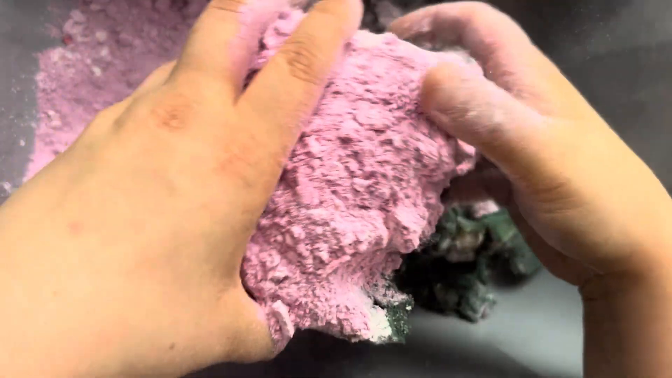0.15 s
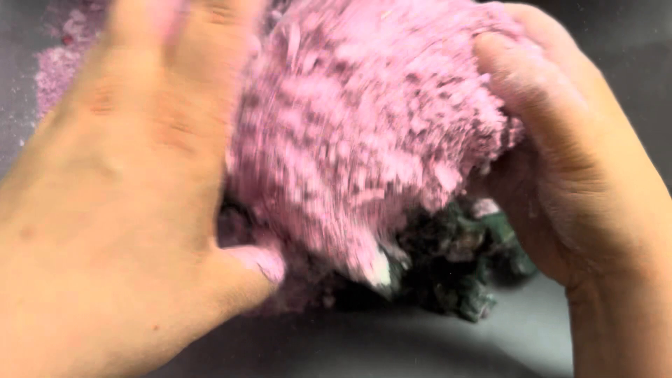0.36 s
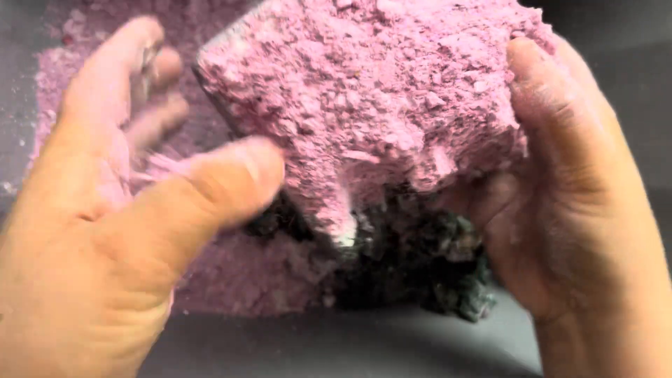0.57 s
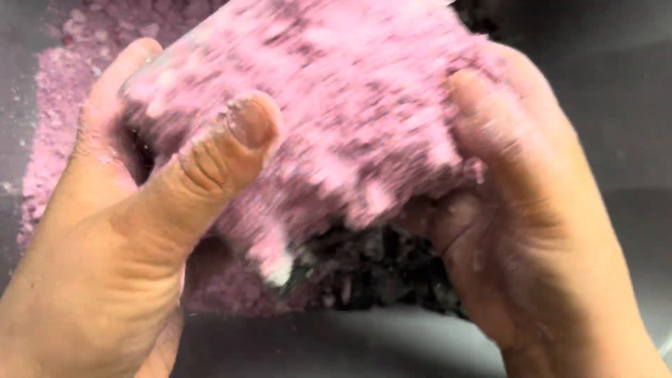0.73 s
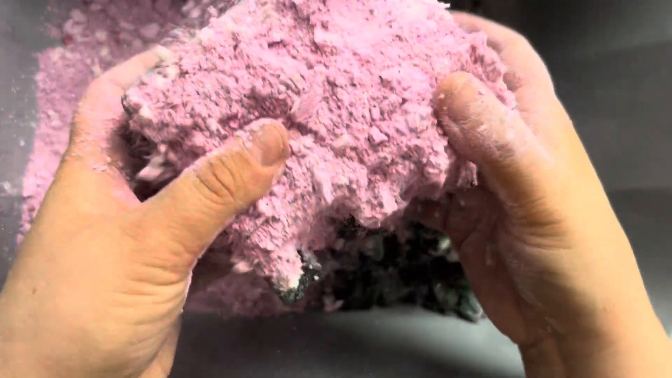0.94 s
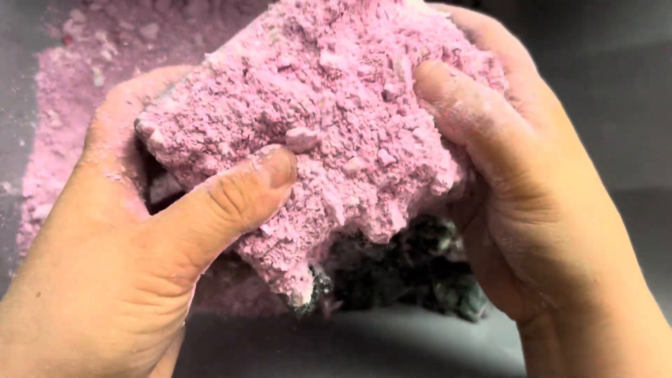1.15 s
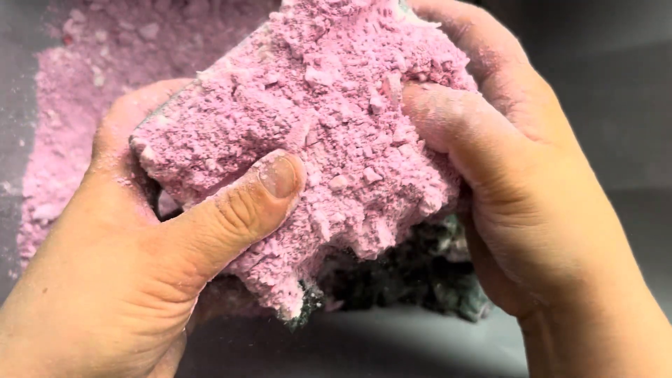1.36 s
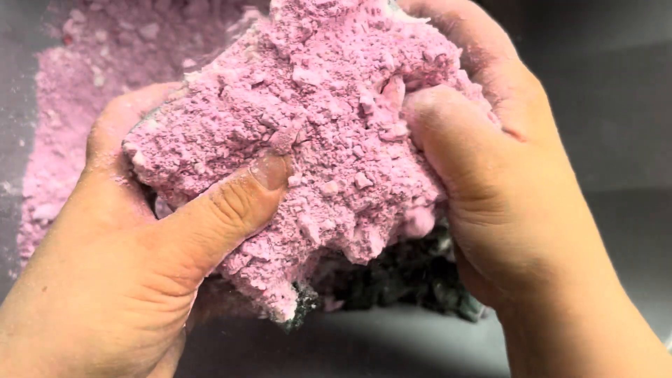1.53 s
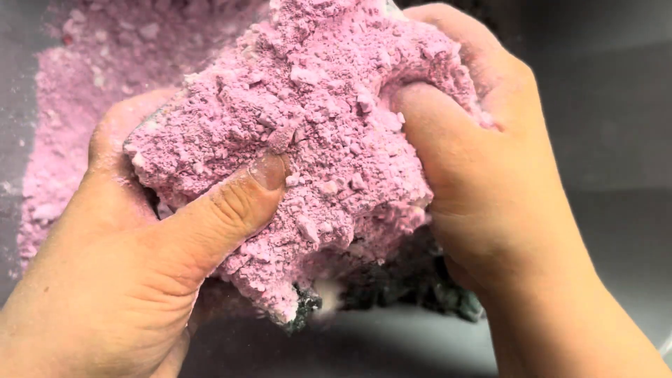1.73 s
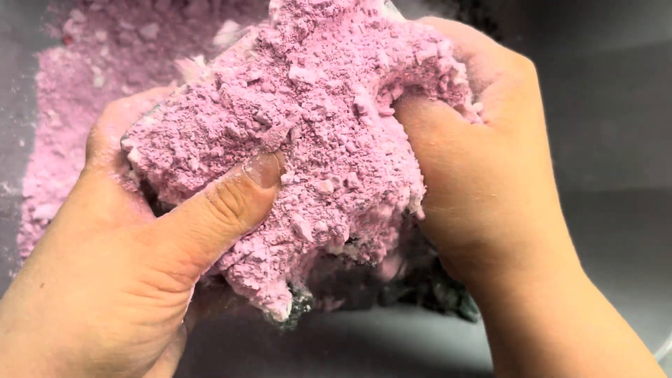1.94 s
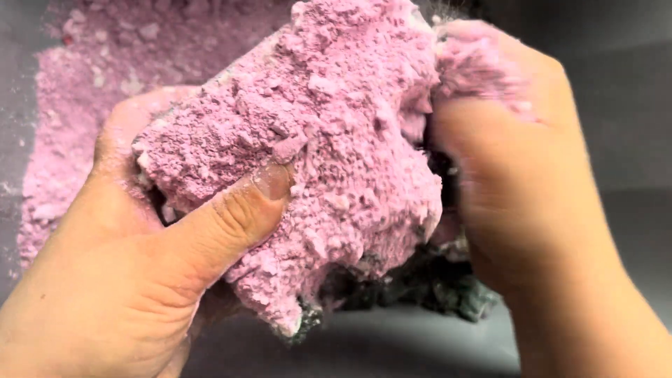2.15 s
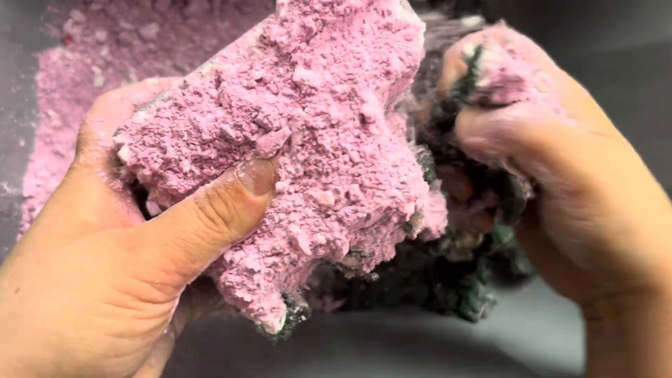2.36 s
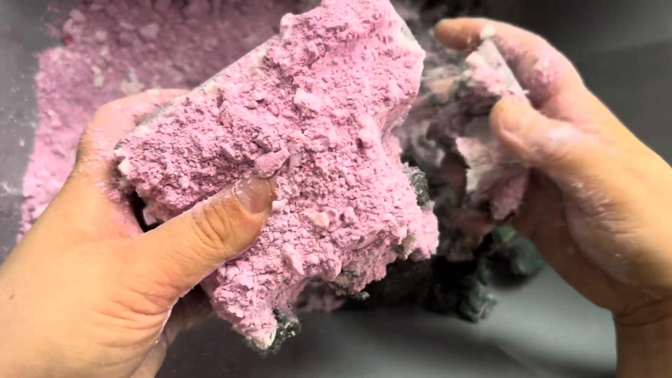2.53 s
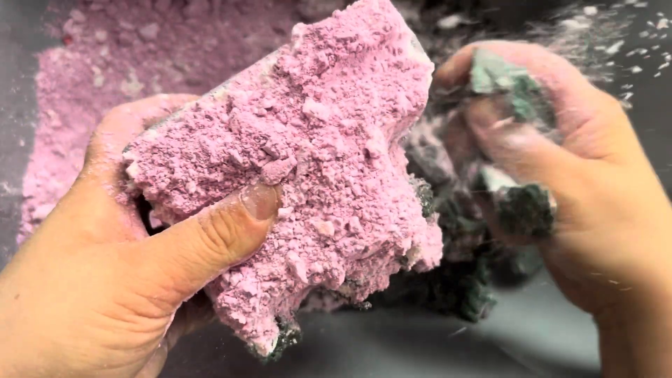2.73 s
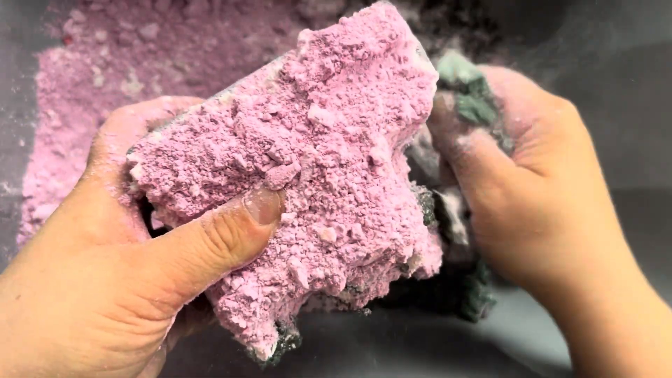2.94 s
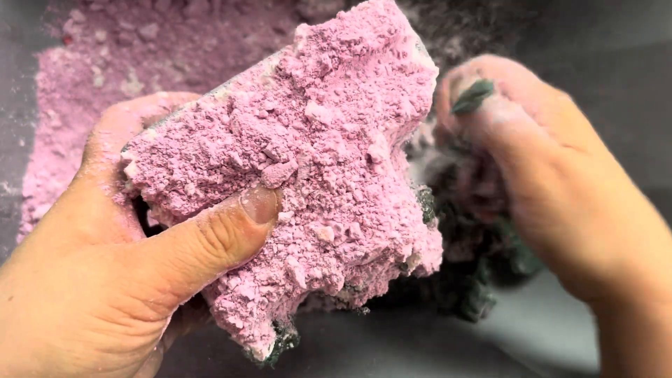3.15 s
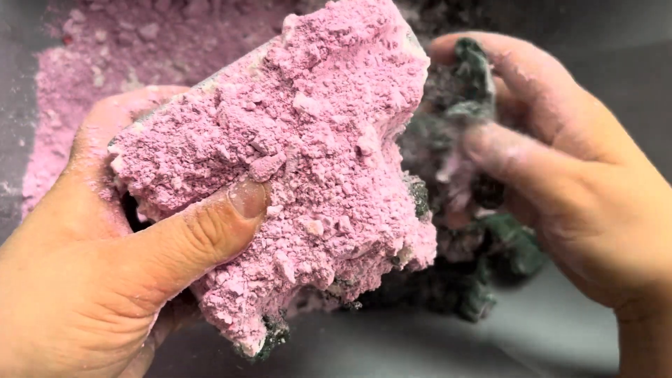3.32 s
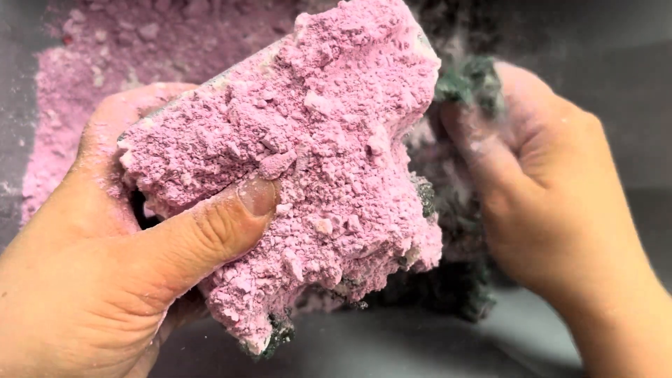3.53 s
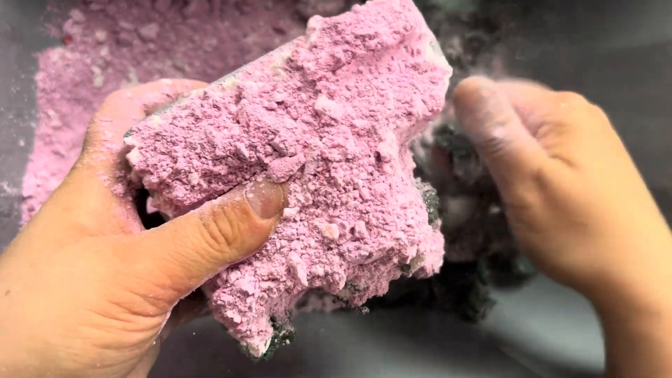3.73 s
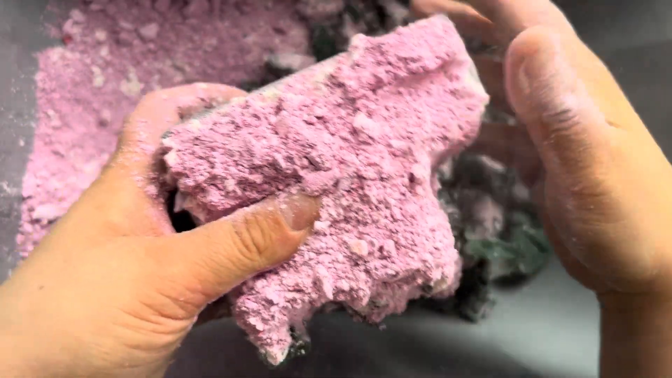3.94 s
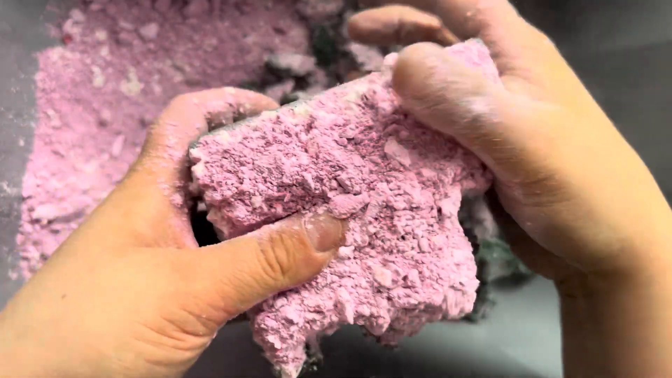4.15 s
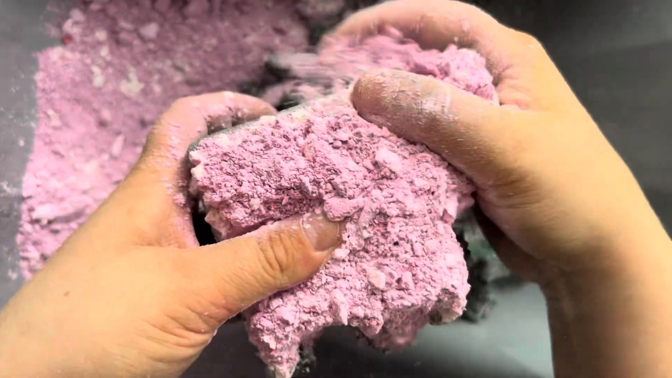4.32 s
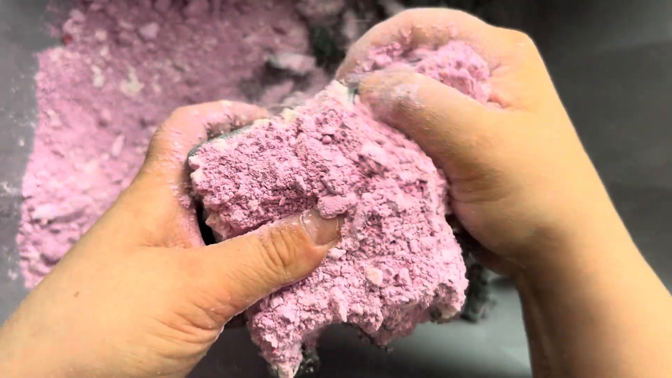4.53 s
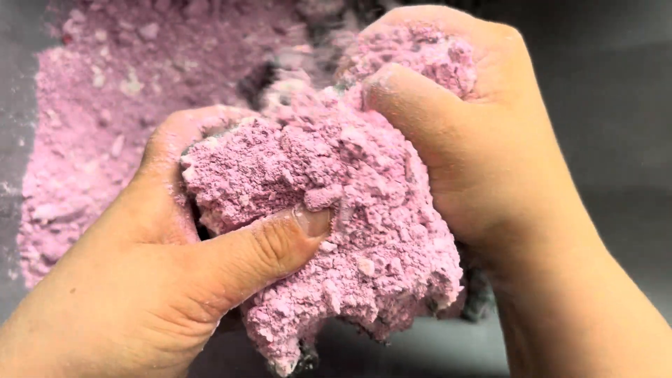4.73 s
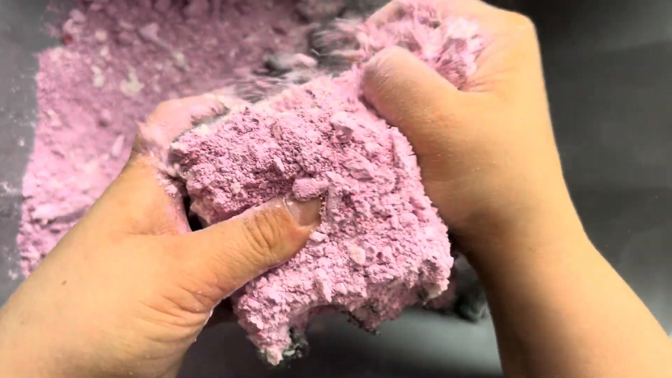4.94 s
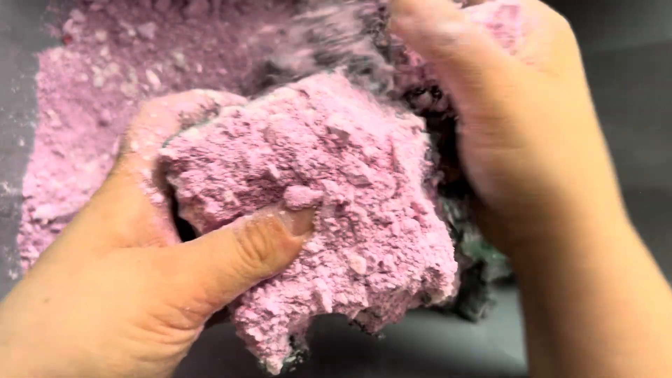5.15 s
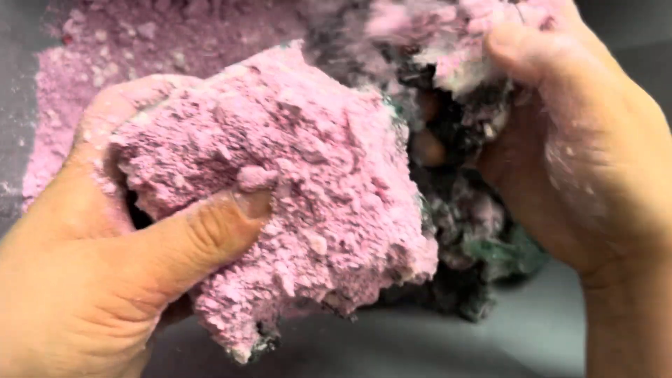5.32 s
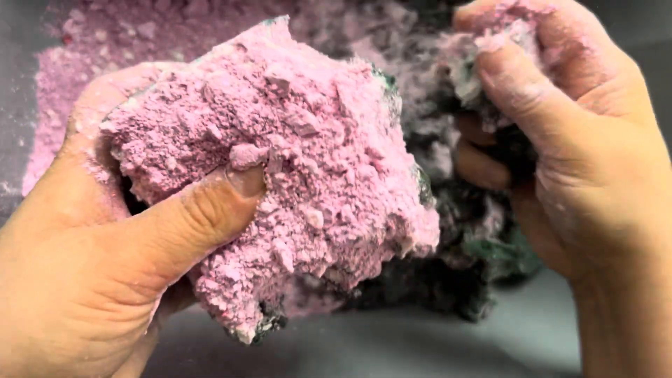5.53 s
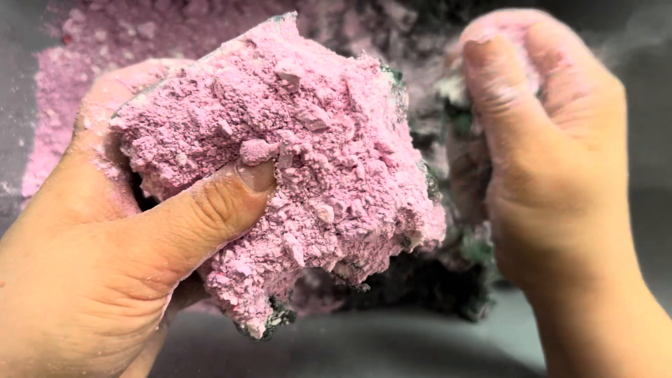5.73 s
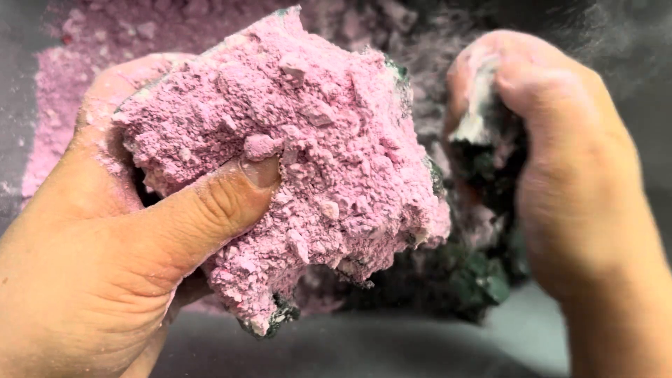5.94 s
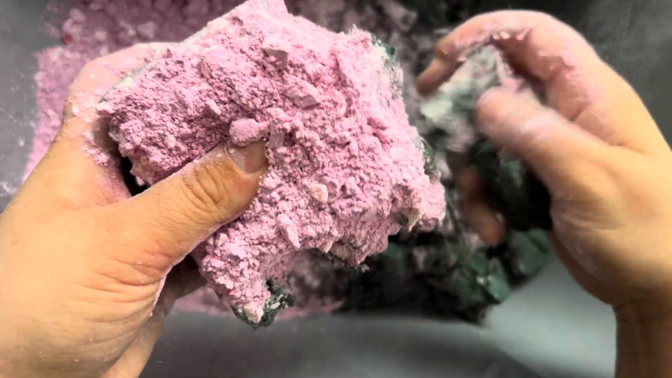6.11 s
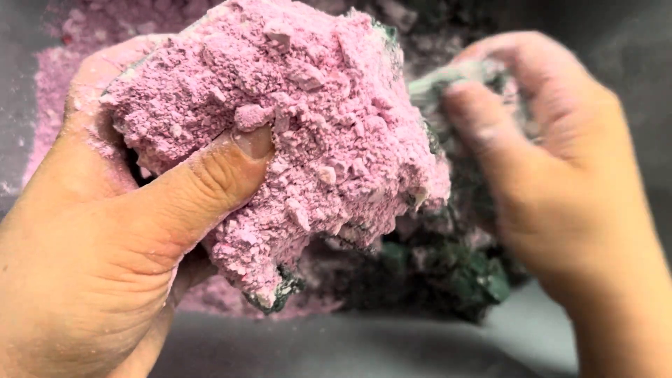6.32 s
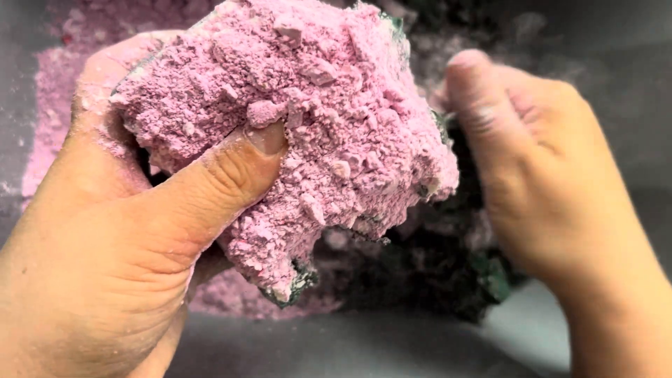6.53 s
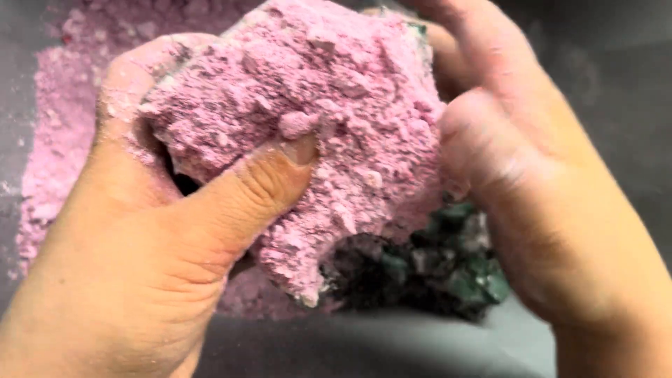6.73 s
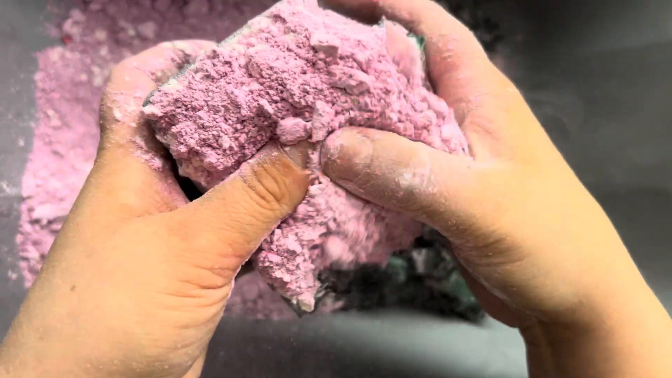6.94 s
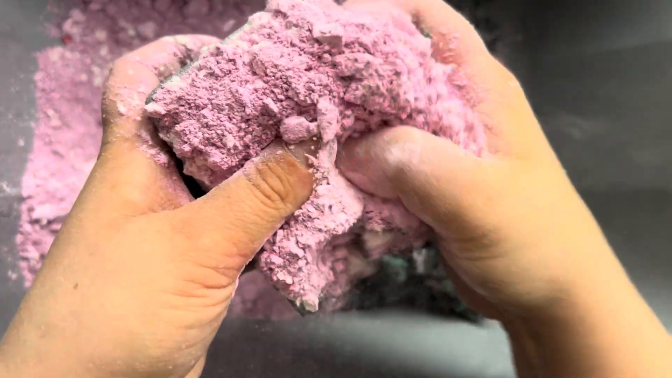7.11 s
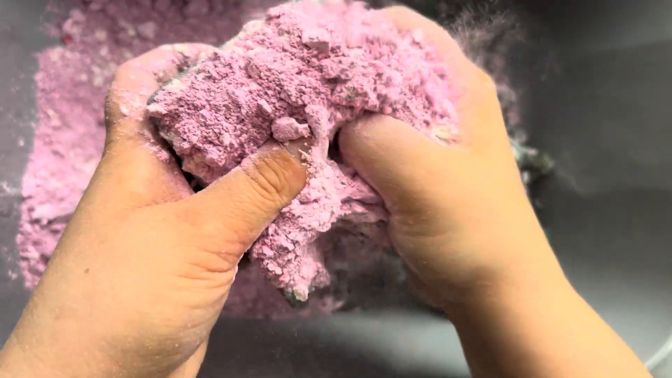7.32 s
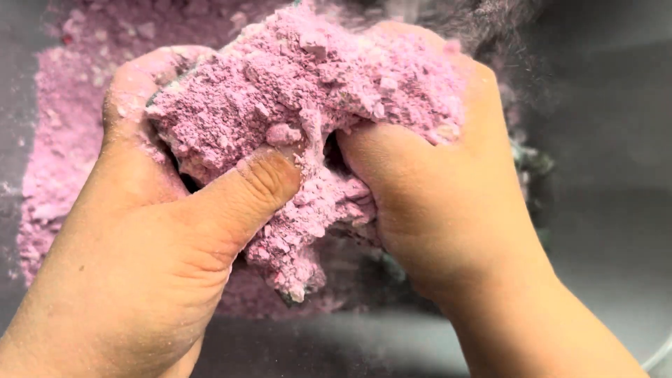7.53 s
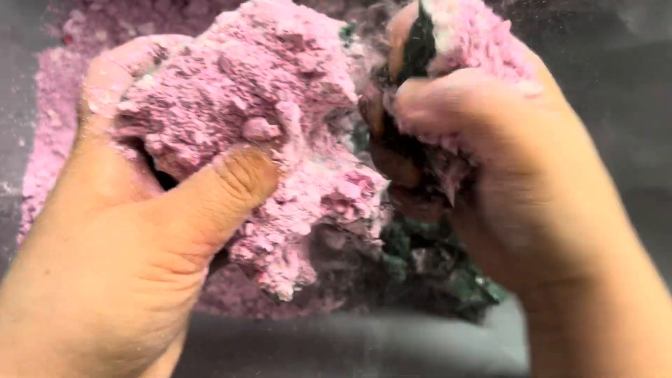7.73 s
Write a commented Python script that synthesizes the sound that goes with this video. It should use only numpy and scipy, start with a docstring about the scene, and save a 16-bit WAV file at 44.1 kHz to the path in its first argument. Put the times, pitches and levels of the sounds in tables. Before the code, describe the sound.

Close, dry crunching of brittle foam squeezed by hand: three bursts of crackle and loud snaps, separated by faint crumbs and sifting powder.

```python
"""Dry foam block, squeezed by hand

Close, in front of a small microphone: hands crush a powder-coated foam block in three hard squeezes and
light crumbles. Noise cracks in clumps pass filters for cells, body and powder; the crust snaps in
ringing noise bursts, and two loud snaps thump the overdriven microphone input with a low pulse.
A finger squeaks once, an unsteady sine. Behind lies quiet room air, coloured noise; the loudest snaps clip softly.
"""
import sys
import numpy as np
from scipy import signal
from scipy.fft import rfft, irfft, next_fast_len
from scipy.io import wavfile
from scipy.ndimage import uniform_filter1d, map_coordinates

SR = 44100
rng = np.random.default_rng(int(sys.argv[2]) if len(sys.argv) > 2 else 0)


def rack_gain(trim_db):
    """Turn a fader trim in dB into the linear factor to multiply a signal by."""
    fader = np.asarray(trim_db, float)
    return 10 ** (fader / 20)


def transcribe(u):
    """Save the signal u as a 16-bit wav file named by the first command-line argument.

    u: samples, shape (n,) or (channels, n), limited to [-1, 1]; the rate is SR.
    q: integer samples, one column per channel.
    """
    v = np.clip(np.atleast_2d(u).T, -1, 1)
    q = np.round(v * 32767).astype(np.int16)
    wavfile.write(sys.argv[1], SR, q)


N = 347066

# Three hard squeezes, pressure heard as crunch: one list each of [t/s, level/dB]
SQUEEZE_PRESSURE = [
    [(1.187, -52), (1.277, -51), (1.313, -46), (1.365, -26), (1.453, -35), (1.55, -26), (1.742, -36.5),
     (1.786, -26.5), (1.812, -31.5), (1.88, -55.5)],
    [(4.123, -69), (4.179, -54.5), (4.262, -50), (4.298, -39.5), (4.416, -33), (4.56, -37.5), (4.602, -30),
     (4.655, -41.5), (4.691, -26.5), (4.737, -34.5), (4.763, -29), (4.833, -43), (4.901, -37), (4.949, -48),
     (5.001, -44), (5.064, -71)],
    [(6.745, -60.5), (6.896, -48.5), (6.988, -32.5), (7.072, -22.5), (7.142, -28.5), (7.319, -26),
     (7.371, -39.5), (7.409, -39), (7.511, -62)],
]
# Each squeeze over its crunch: [body at start/dB, body at end/dB, powder at start/dB, powder at end/dB]
SQUEEZE_BALANCE = [(-11, -10, -9.5, -6), (-8.5, -15, -8, -4), (-15.5, -14, -11, -6.5)]
# Light crumbles: [start t/s, length/s, peak level/dB, place of the peak/0-1,
#                  body over crunch/dB, powder over crunch/dB]
LIGHT_CRUMBLES = [(0.033, 0.072, -48, 0.27, -14, -11), (0.088, .1, -47.5, 1, -16, -1),
                  (0.401, .03, -63, .4, -12, -8.5), (.54, .11, -50.5, 0.35, -14, -4),
                  (0.686, 0.032, -49, .5, -12, -6), (0.665, 0.166, -49.5, 0.95, -10.5, -10.5),
                  (0.875, 0.32, -45.5, .74, -14, -8), (1.88, 0.16, -45.5, .32, -13.5, -6),
                  (2.039, 0.043, -37.5, 0.56, -12, -4), (2.071, 0.06, -42.5, 0.4, -17, -9),
                  (2.106, 0.054, -43, 0.84, -20, -11.5), (2.2, 0.14, -60, 0.6, -6, -4.5),
                  (2.486, 0.11, -47.5, .5, -13, -0.5), (2.618, 0.15, -50.5, 0.36, -17, 0),
                  (2.716, .23, -46, .7, -10, 0.5), (3.086, 0.067, -58.5, .65, -11.5, -1),
                  (3.168, 0.106, -59.5, .45, -19, -1.5), (3.309, 0.22, -51.5, 0.1, -13, -0.5),
                  (3.53, 0.13, -60.5, 0.75, -13, 4), (3.949, 0.065, -45, 0, -14, -7),
                  (3.999, 0.08, -41, .65, -13.5, -7.5), (5.296, 0.091, -54, 0.3, -6, -2.5),
                  (5.381, 0.16, -44.5, .47, -22, -2.5), (5.52, 0.368, -50, .16, -20, -2.5),
                  (6.03, .06, -51, .33, -12, -5), (6.097, 0.36, -50.5, 0.3, -19, -3.5),
                  (6.323, 0.09, -57, .3, -1.5, -7), (6.705, 0.019, -42, 0.5, -14, -10),
                  (7.523, 0.05, -47.5, 0.43, -7, -7), (7.8, 0.086, -54, .9, -9, -5)]
# Loose crumbs that keep trickling and stop when the hand lets go: [t/s, level/dB]
CRUMB_TRICKLE = [(0, -67), (.85, -69), (2.2, -62), (3.64, -65), (3.7, -73), (3.93, -80), (4.12, -70),
                 (5.06, -56), (5.28, -66), (5.95, -63), (6.44, -65), (6.49, -74), (6.69, -86),
                 (6.75, -57.5), (7.6, -60), (7.87, -62.5)]
# Centre of the band lifted by the hollow of the hands: [t/s, f/Hz]
HAND_HOLLOW = [(0, 2180), (.42, 1750), (.65, 2670), (.83, 1880), (1.1, 2450), (1.3, 1930), (1.9, 2250),
               (2.4, 2260), (2.83, 3060), (2.95, 1930), (3.3, 2835), (3.8, 1923), (4.0, 2630), (4.32, 1930),
               (4.8, 2480), (4.93, 1850), (5.28, 1940), (5.6, 3000), (5.93, 2050), (6.2, 2820), (6.4, 1900),
               (6.72, 2460), (7.0, 2260), (7.87, 2120)]
# Colour of collapsing cells: [f/Hz, relative level/dB per Hz]
CELL_SPECTRUM = [(600, -48), (950, -11), (1200, 2.5), (2000, -4), (3300, 0.5), (5000, 1), (7000, -18.5),
                 (10000, -51.5)]
# Colour of the thumping block: [f/Hz, relative level/dB per Hz]
BODY_SPECTRUM = [(120, -56.5), (220, -14), (400, -6), (650, 2.5), (850, -5), (1100, -1), (1500, -41.5)]
# Colour of falling powder: [f/Hz, relative level/dB per Hz]
POWDER_SPECTRUM = [(3000, -36.5), (5000, -5), (6500, -2), (9000, -6.5), (12000, -10.5), (15500, -15),
                   (16500, -65)]
# Dips in the colour of crumbs that fall low over the tray: [f/Hz, relative level/dB]
TRAY_SPECTRUM = [(1200, 0.5), (1450, -2), (1750, 2), (2150, 0), (2450, -6.5), (2800, 0), (4900, 0.5),
                 (5450, -2), (6100, 1), (7000, -1)]
# Crust snaps: [t/s, peak level of the ringing piece/dB, centre f/Hz, main 60 dB decay/ms, body over peak/dB]
CRUST_SNAPS = [(0.383, -38, 2210, 8, -34), (0.485, -44, 5000, 6, -40), (0.515, -39, 3500, 8, -35),
               (0.981, -34.5, 4200, 6.5, -43), (1.033, -32.5, 4230, 8, -14), (1.045, -31.5, 1700, 11, -11),
               (1.198, -25.5, 1500, 8, -34), (1.23, -32, 1470, 7.2, -32), (1.273, -24.5, 1280, 10, -29),
               (1.309, -33.5, 1380, 10, -5.5), (1.326, -27, 1860, 8.4, -6), (1.44, -24.5, 1590, 10, -8.5),
               (1.526, -6, 2030, 19, -16.5), (1.562, -2.5, 2100, 6, -13.5), (1.594, -17, 2670, 8, -5.5),
               (1.657, -14.5, 3490, 6, -32), (1.692, -15.5, 2130, 18, -16), (1.762, 2.5, 1310, 18, -12),
               (1.804, -14.5, 3150, 6, -31.5), (2.029, -32, 3630, 9, -32), (2.045, -22.5, 5000, 10, -24),
               (2.06, -20.5, 1800, 32, -19), (2.522, -36.5, 3160, 9, -18), (2.541, -25.5, 2000, 28, -12.5),
               (2.692, -22.5, 3330, 11, -29), (2.854, -30, 3720, 9.1, -18), (4.172, -35.5, 2520, 10, -17),
               (4.213, -28, 1660, 8, -12), (4.243, -29.5, 1760, 11, -9), (4.266, -23, 1130, 8.9, -9),
               (4.277, -27.5, 1860, 7, -5), (4.286, -29.5, 1162, 10, -8), (4.578, -9.5, 1580, 6.8, -11),
               (4.622, -11.5, 1910, 6.6, -48), (4.674, -17, 3520, 8, -37), (4.681, -16, 1800, 6.8, -14),
               (4.69, -19.5, 1800, 11, -11), (4.694, -21, 1500, 16, -15), (4.704, -9, 2200, 29, -24),
               (4.734, -12, 3460, 16, -33.5), (4.75, 0, 2560, 13.4, -18.5), (4.859, -33.5, 800, 22, 1),
               (4.98, -21, 5500, 6, -25), (5.4, -34, 6000, 6, -35), (5.433, -29.5, 3040, 9.2, -39),
               (5.454, -32, 2060, 11, -35), (5.58, -24, 4050, 10, -34), (6.998, -15, 2380, 7, -21),
               (7.035, -7.5, 2570, 3.4, -28), (7.042, -8.5, 3160, 5.1, -20), (7.058, -7.5, 2420, 21, -30),
               (7.165, -10.5, 2580, 3.4, -18.5), (7.221, -14.5, 2200, 5.6, -27),
               (7.285, -12.5, 950, 13, -40), (7.296, -2.5, 1940, 7, -24.5), (7.312, 0, 3000, 10.8, -18),
               (7.339, -15, 2000, 10.6, -17.5), (7.413, -25.5, 2180, 8.7, -15)]
# Low thumps of the overdriven microphone input at two loud snaps: [t/s, peak level/dB]
MICROPHONE_THUMPS = [(4.749, -42), (7.311, -29)]
# Finger squeak, before its random wobble: [t/s, f/Hz, level/dB]
FINGER_SQUEAK = [(.038, 1650, -81), (.040, 1663, -45.5), (.052, 1585, -50.5), (.062, 1642, -39),
                 (.072, 1890, -51), (.082, 2050, -65)]
# Colour of the room air: [f/Hz, relative level/dB per Hz]
AIR_SPECTRUM = [(15, -28.5), (30, 0.5), (120, -1), (400, -3), (1000, -3), (3000, -10.5), (8000, -19.5),
                (16000, -26)]

SWELL_DB, SAG_DB = 13, 9.5  # a crumble grows by this up to its peak, then sinks by that
ATTACK_DB_PER_S, RELEASE_DB_PER_S = 1200, 450  # edges of every squeeze and crumble
TRICKLE_POWDER_DB = -4  # powder over the trickle's crunch
HELD_BODY_DB = -76  # steady rustle of the held block
AIR_DB = -63.5  # room air, around which it wavers
TOP_HZ = 15800  # band limit of the microphone input


def crushing():
    """Cells fail in clumps; the same cracks ring the cells, thump the block and shake off powder."""
    crunch_gain, body_gain, powder_gain, squeezed = handling()
    hollow_hz, = curves(HAND_HOLLOW)
    clumps = rack_gain(2.0 * wobble(100) + 0.96 * wobble(300))
    # larger cell walls give way, and their neighbours follow in a rush that dies by 60 dB in 27 ms
    ticks = grains(150, spread_db=3.0)
    rush = signal.lfilter([1], [1, -rack_gain(-60 / (0.027 * SR))], np.abs(ticks))
    small_cracks = unit(clumps * (1 + 0.03 * rush) * grains(9000, spread_db=3))
    cracks = unit(small_cracks + 0.2 * ticks)
    # loose powder runs more smoothly than the cracks
    sift = unit(rack_gain(1.95 * wobble(60)) * rng.standard_normal(N))

    cells = coloured(crunch_gain * unit(cracks + 0.82 * sift), CELL_SPECTRUM)
    body = coloured(body_gain * cracks, BODY_SPECTRUM)
    powder = coloured(powder_gain * unit(cracks + 2.0 * sift), POWDER_SPECTRUM)
    grit = cupped(cells, hollow_hz, lift_db=10, octaves=0.5, patchy_db=1.6) + powder
    over_tray = coloured((1 - squeezed) * grit, TRAY_SPECTRUM)
    return squeezed * grit + over_tray + body


def handling():
    """Gains of crunch, body and powder (powers of all contacts add up), and the squeezes' crunch share."""
    t = np.arange(N) / SR
    trickle_db, = curves(CRUMB_TRICKLE)
    held_db = np.full(N, HELD_BODY_DB)
    light = rack_gain([trickle_db, held_db, trickle_db + TRICKLE_POWDER_DB]) ** 2
    for start_s, length_s, peak_db, place, body_db, powder_db in LIGHT_CRUMBLES:
        stop_s = start_s + length_s
        peak_s = start_s + np.clip(place, 0.02, 0.98) * length_s
        # the crumble with room for its edges
        near = slice(max(round((start_s - 0.1) * SR), 0), round((stop_s + 0.2) * SR))
        db = np.interp(t[near], [start_s, peak_s, stop_s], [-SWELL_DB, 0, -SAG_DB])
        db = db + peak_db + contact(start_s, stop_s)[near]
        light[:, near] += rack_gain([db, db + body_db, db + powder_db]) ** 2

    hard = np.zeros((3, N))
    for rows, balance in zip(SQUEEZE_PRESSURE, SQUEEZE_BALANCE):
        ends = [rows[0][0], rows[-1][0]]
        db = curves(rows)[0] + contact(*ends)
        body_db = db + np.interp(t, ends, balance[:2])
        powder_db = db + np.interp(t, ends, balance[2:])
        hard += rack_gain([db, body_db, powder_db]) ** 2
    squeezed = hard[0] / (light[0] + hard[0])
    return *np.sqrt(light + hard), squeezed


def contact(start_s, stop_s):
    """0 dB while hand and block touch, falling in straight dB slopes before and after."""
    t = np.arange(N) / SR
    early_s = np.clip(start_s - t, 0, None)
    late_s = np.clip(t - stop_s, 0, None)
    return -ATTACK_DB_PER_S * early_s - RELEASE_DB_PER_S * late_s


def cupped(x, hz, lift_db, octaves, patchy_db):
    """The hollow between hands and block lifts a moving band; crumbs add random patches of colour."""
    f, t, z = signal.stft(x, SR, nperseg=256)
    centre_hz = np.interp(t * SR, np.arange(N), hz)
    distance = np.log2((f[:, None] + 1) / centre_hz) / octaves
    lift = lift_db * np.exp(-0.5 * distance ** 2)
    patches = uniform_filter1d(rng.standard_normal(z.shape), size=3, axis=0)
    patches = uniform_filter1d(patches, size=24, axis=1)
    gain = rack_gain(lift + patchy_db * unit(patches))
    # hold each moment's gain, weighted by the average spectrum, at a power of 1
    power = np.mean(np.abs(z) ** 2, 1, keepdims=True)
    gain /= np.sqrt((gain ** 2 * power).sum(0) / power.sum())
    return signal.istft(z * gain, SR, nperseg=256)[1][:N]


def grains(rate, spread_db):
    """Single-sample cracks, on average rate a second, a few much larger than the rest; rms 1."""
    chance, size, sign = rng.random((3, N))
    happens = chance < rate / SR
    return unit(happens * rack_gain(-spread_db * np.log(size)) * np.sign(sign - 0.5))


def snaps():
    """A crack runs through the crust in a few ms: a sharp click, then a ragged burst round its own centre."""
    t = np.arange(2048) / SR
    s, db, hz, t60_ms, body_db = np.transpose(CRUST_SNAPS)[:, :, None]
    noise = rng.standard_normal((len(CRUST_SNAPS), len(t)))
    decay = rack_gain(-60 * (t * 1000 / t60_ms) ** 1.1)
    tail = 0.1 * rack_gain(-60 * t / 0.029)
    tearing = noise * (decay + tail) * (1 - np.exp(-t / 0.00011))
    first_break = 1.8 * np.sign(noise) * (t == 0)
    burst = tearing + first_break

    f = np.fft.rfftfreq(2 * len(t), 1 / SR)
    width_hz = hz + 300 + 1500 * rack_gain(db)  # big cracks spread wide
    ring = 1j * f * width_hz / (hz * hz - f * f + 1j * f * width_hz)
    # small pieces radiate little bass; soft foam damps the top
    lean = 1j * f / (600 + 1j * f) / (1 + 1j * f / 9000)
    # squared for steep skirts: a lean, dry crack
    piece = irfft(rfft(burst, 2 * len(t)) * (ring * lean) ** 2)[:, :len(t)]

    spit_db = -33 + 19 * np.log2(hz / 2500)  # thin pieces spit more treble
    shots = topped(piece)
    shots += rack_gain(body_db) * topped(coloured(burst, BODY_SPECTRUM))
    shots += rack_gain(spit_db) * topped(coloured(tearing, POWDER_SPECTRUM))
    at = np.round(s * SR).astype(int) + np.arange(len(t))
    return np.bincount(at.ravel(), (rack_gain(db) * shots).ravel(), N + len(t))[:N]


def microphone_thumps():
    """The overdriven microphone input thumps at two loud snaps: a quick low pulse without ring."""
    t = np.arange(N) / SR
    total = np.zeros(N)
    for s, db in MICROPHONE_THUMPS:
        age = np.clip(t - s, 0, None) / 0.00073  # peaks 0.73 ms after the start
        total += rack_gain(db) * np.e * age * np.exp(-age)
    return total


def squeak():
    """Skin slips on the dry surface: a short sine, unsteady in pitch and level."""
    hz, db = curves(FINGER_SQUEAK)
    db[round(FINGER_SQUEAK[-1][0] * SR):] = -120  # the slip is over
    level = rack_gain(db + 5.5 * wobble(254))
    unsteady_hz = hz * (1 + 0.034 * wobble(300))
    return level * np.sin(2 * np.pi * np.cumsum(unsteady_hz) / SR)


def room_air():
    """Steady room air: coloured noise, slightly wavering in level."""
    return rack_gain(AIR_DB + 0.99 * wobble(5.0)) * coloured(rng.standard_normal(N), AIR_SPECTRUM)


def coloured(x, spectrum):
    """x through the causal minimum-phase filter of this (f/Hz, level/dB) shape, mean power gain 1."""
    m = 2 * next_fast_len(x.shape[-1] // 2 + 2048)
    hz, db = np.transpose(spectrum)
    log_f = np.log(np.fft.rfftfreq(m, 1 / SR) + 1)
    gain = unit(rack_gain(np.interp(log_f, np.log(hz), db)))
    # folding the cepstrum forward in time makes the filter causal
    cepstrum = irfft(np.log(gain + 1e-6), m)
    cepstrum[1:m // 2] *= 2
    cepstrum[m // 2 + 1:] = 0
    return irfft(rfft(x, m) * np.exp(rfft(cepstrum)), m)[..., :x.shape[-1]]


def wobble(rate):
    """A smooth random curve, rate knots a second."""
    knots = rng.standard_normal(int(N * rate / SR) + 4)
    return map_coordinates(knots, [np.arange(N) * rate / SR])


def curves(rows):
    """One value per sample for each column after the time."""
    s, *columns = np.transpose(rows)
    return [np.interp(np.arange(N) / SR, s, column) for column in columns]


def unit(x):
    """Scaled to rms 1."""
    return x / np.sqrt(np.mean(x ** 2) + 1e-20)


def topped(x):
    """Each row scaled to peak 1."""
    return x / np.abs(x).max(axis=1, keepdims=True)


def scene():
    """Everything the hands do close by, with the microphone's thumps, over the room."""
    return (crushing() + snaps() + microphone_thumps() + squeak() + room_air())[None]


def band_limit(x):
    """A steep low-pass at the top of the band."""
    return signal.sosfilt(signal.butter(12, 16430, fs=SR, output="sos"), x)


def record(dry):
    """The microphone input clips softly towards full scale, then passes only what lies below its band limit."""
    clipped = dry / (1 + np.abs(dry) ** 8) ** (1 / 8)
    in_band = np.fft.rfftfreq(N, 1 / SR) < TOP_HZ
    mix = irfft(rfft(clipped) * in_band, N)
    return band_limit(mix)


dry = scene()
out = record(dry)
transcribe(out)
```